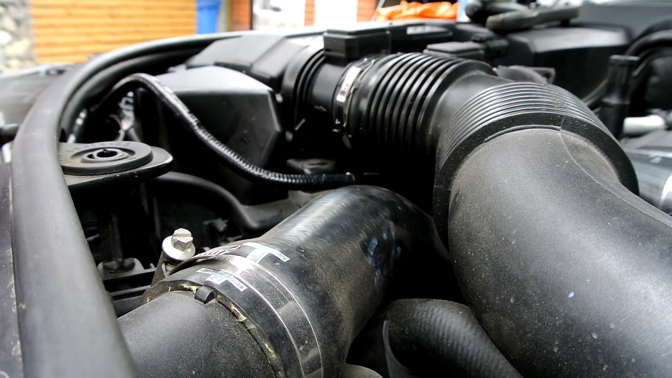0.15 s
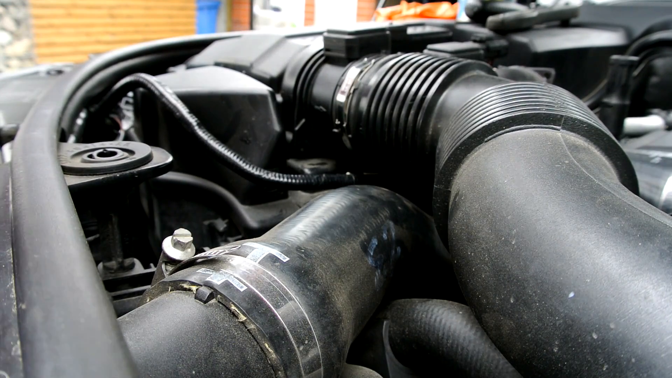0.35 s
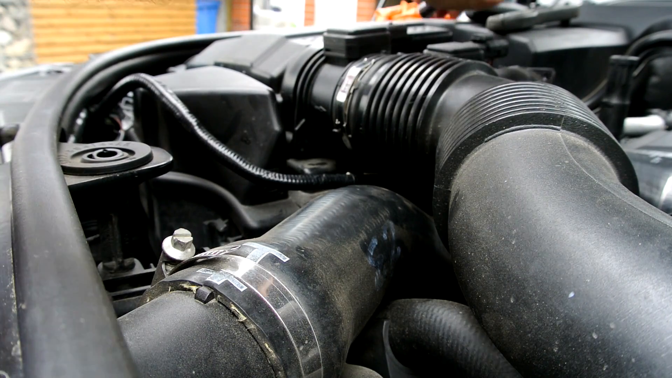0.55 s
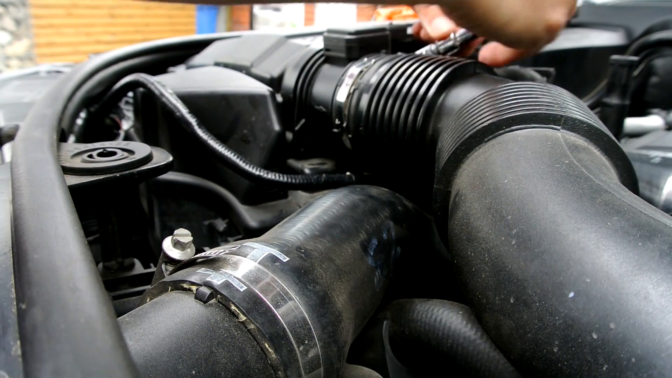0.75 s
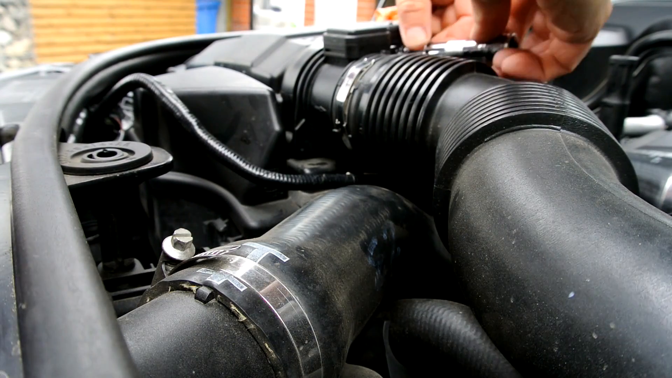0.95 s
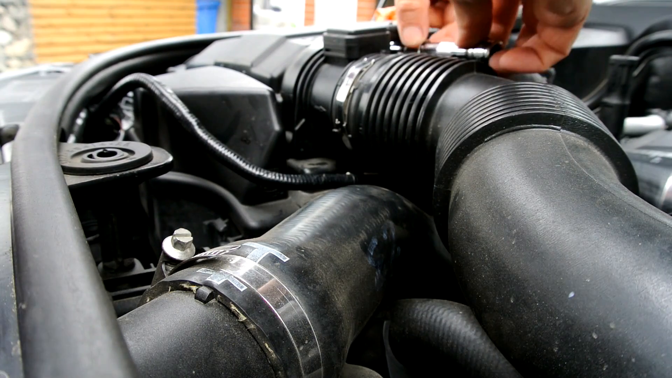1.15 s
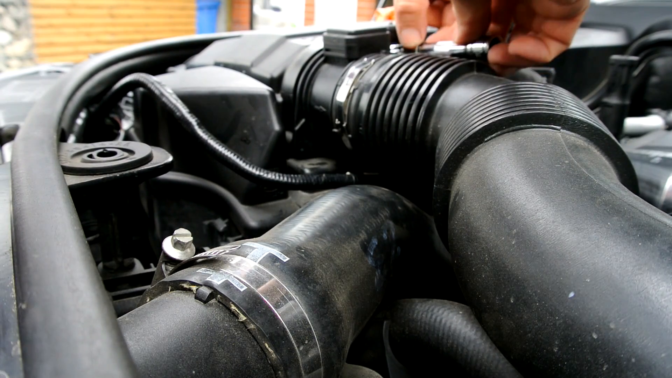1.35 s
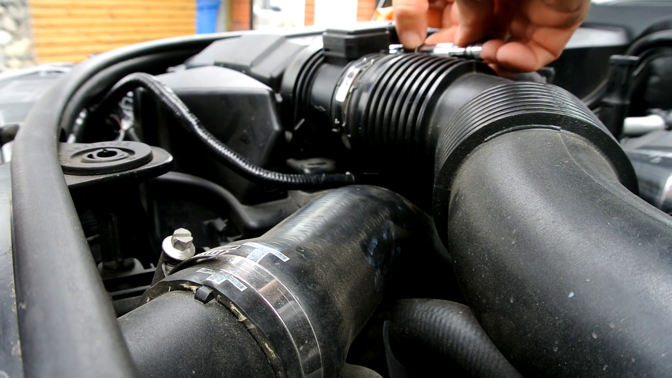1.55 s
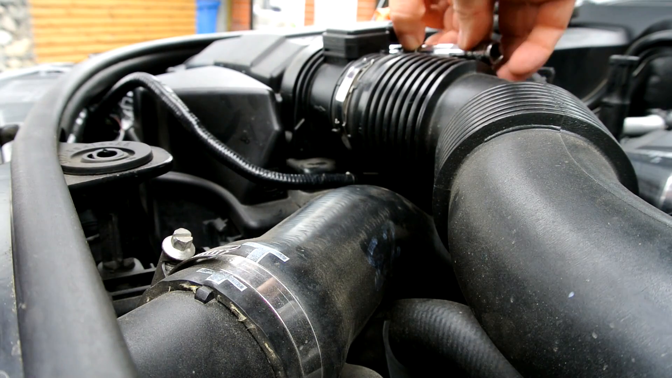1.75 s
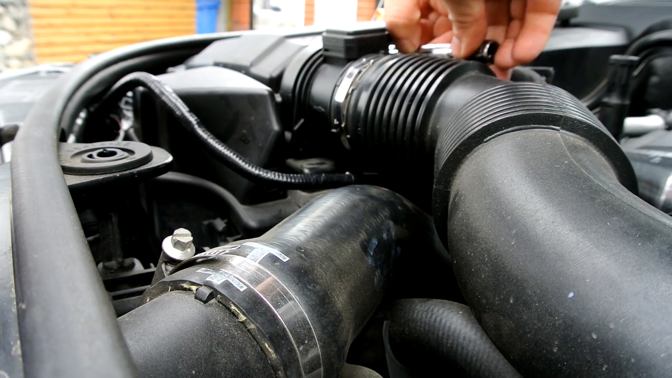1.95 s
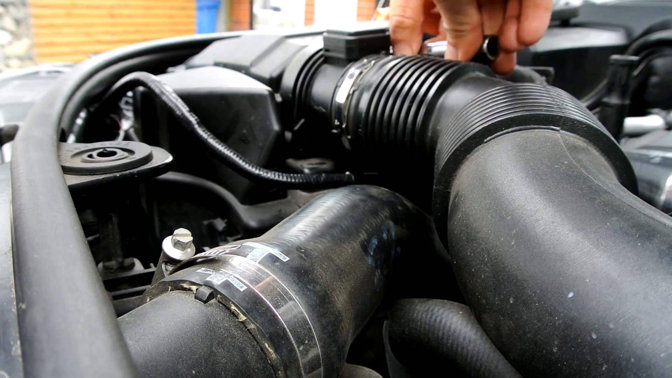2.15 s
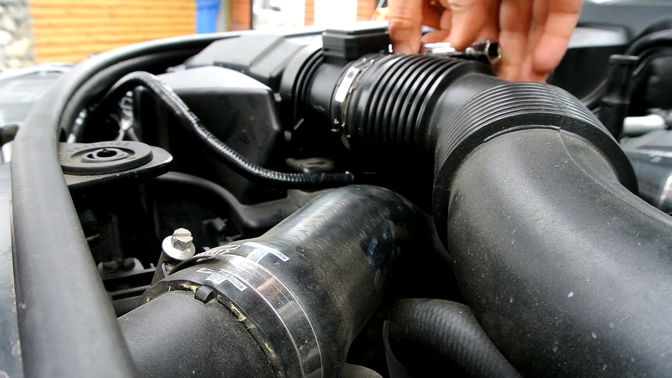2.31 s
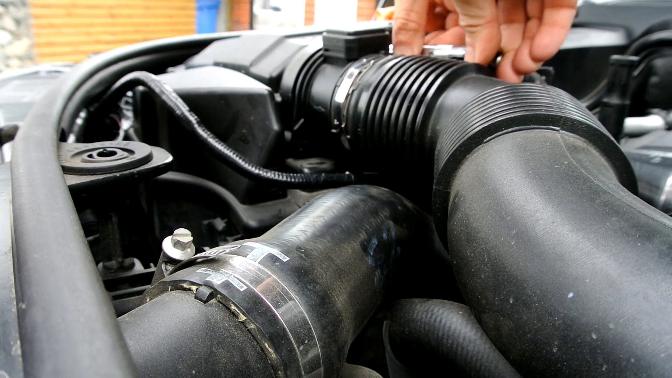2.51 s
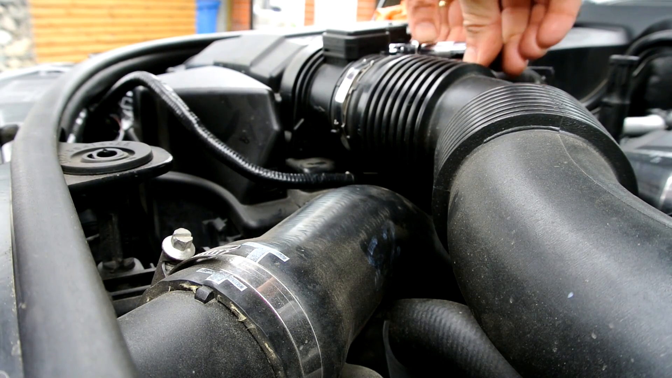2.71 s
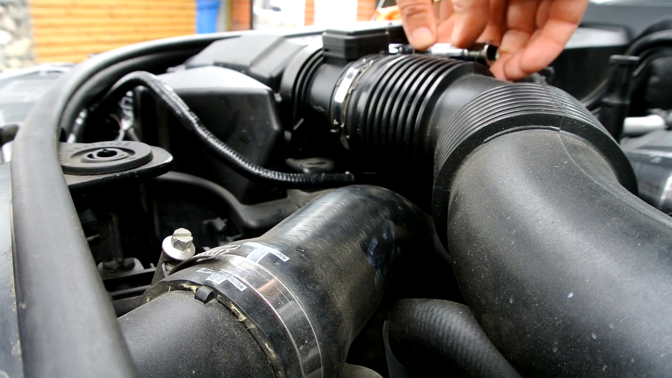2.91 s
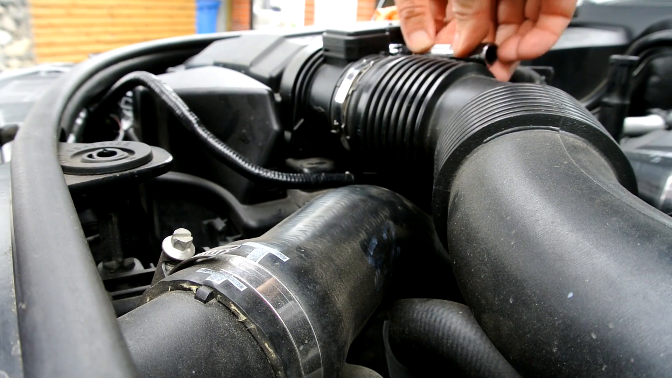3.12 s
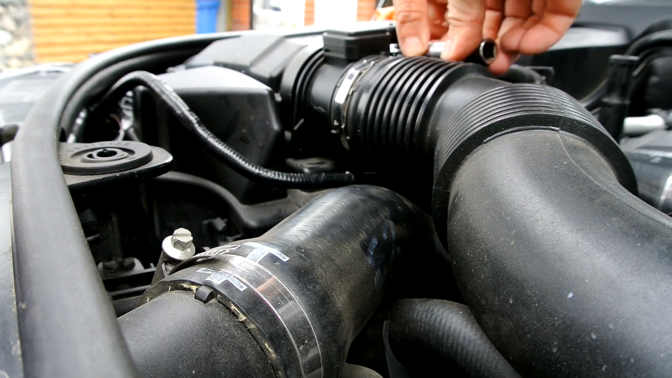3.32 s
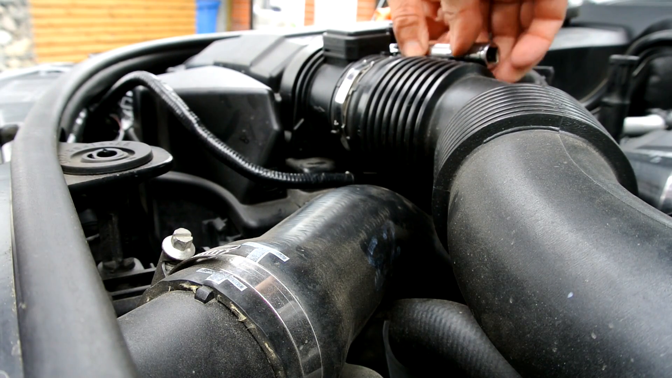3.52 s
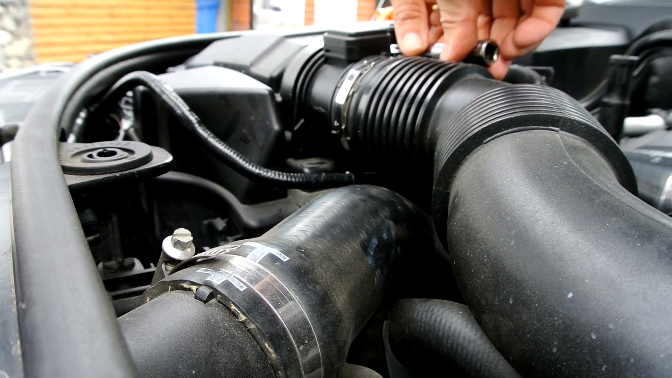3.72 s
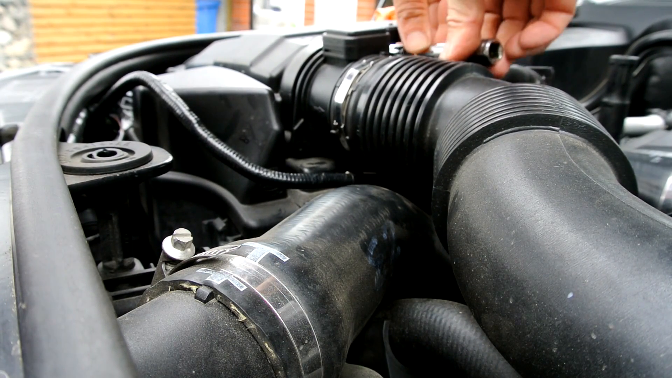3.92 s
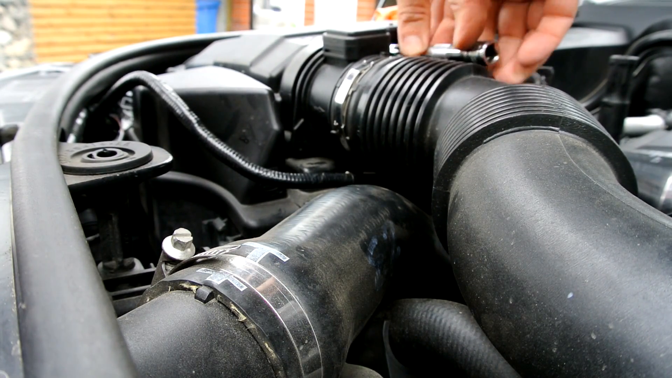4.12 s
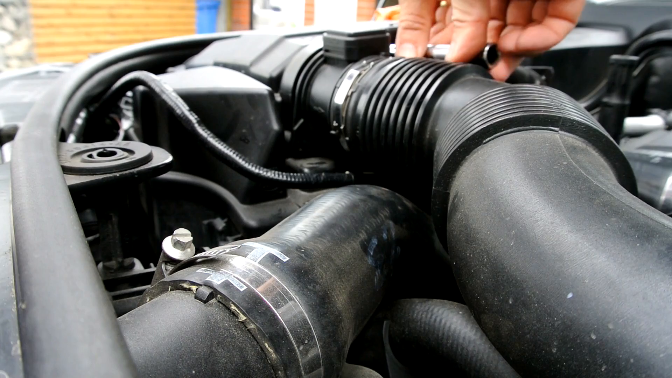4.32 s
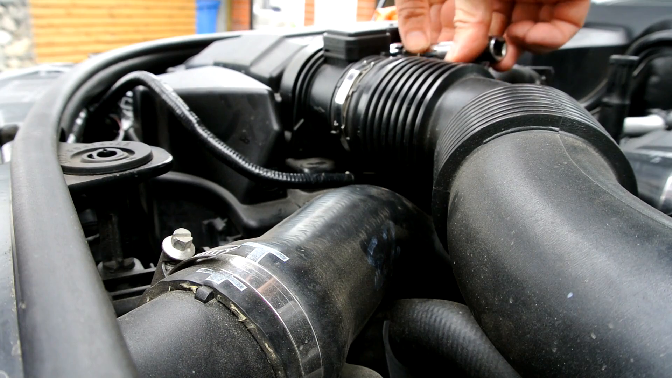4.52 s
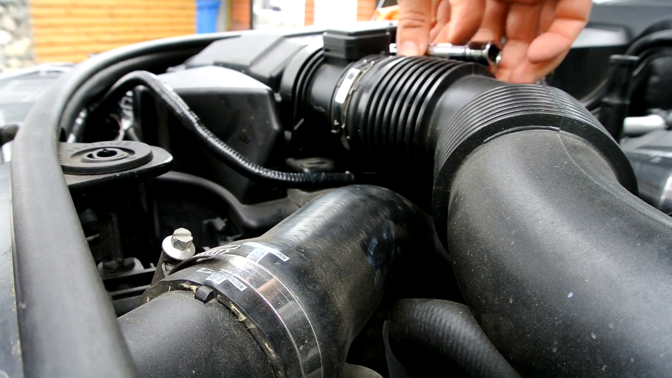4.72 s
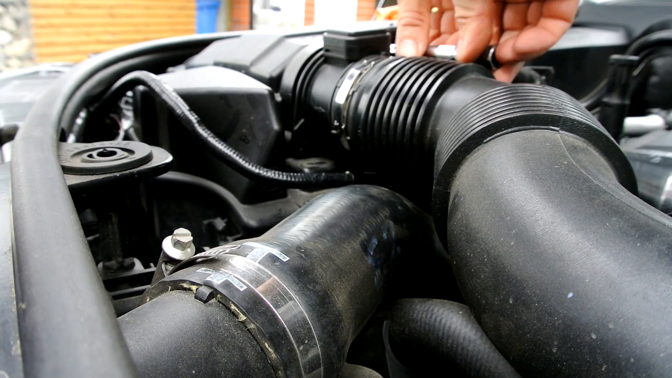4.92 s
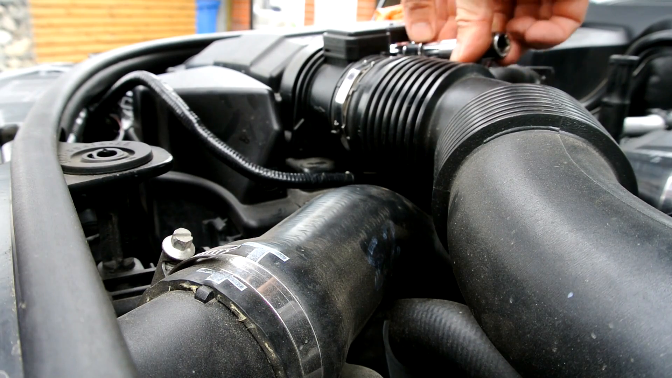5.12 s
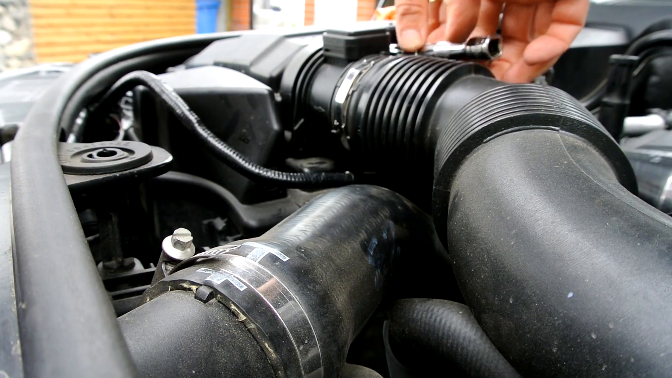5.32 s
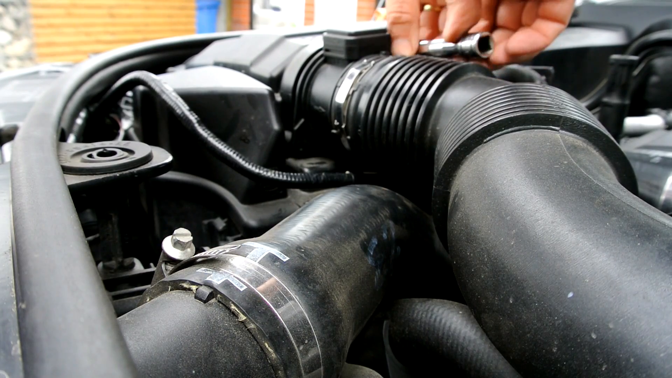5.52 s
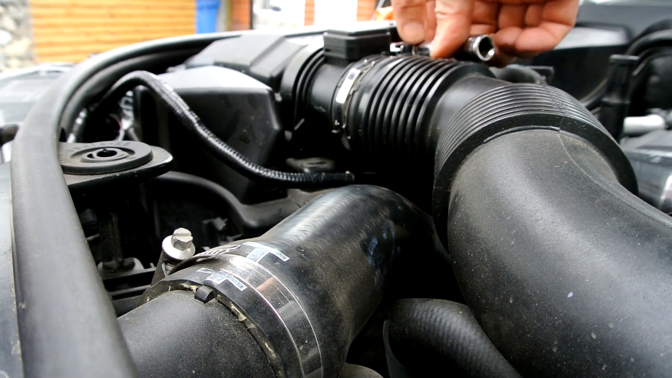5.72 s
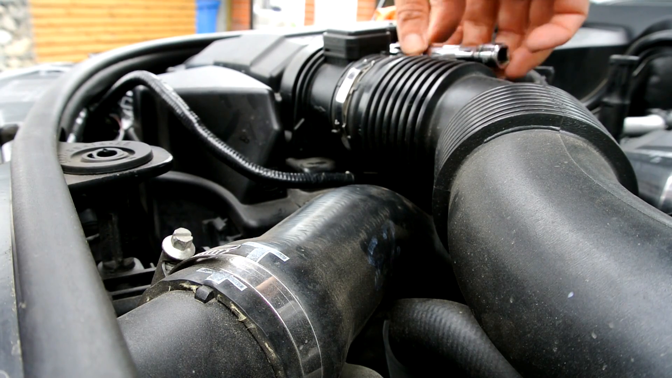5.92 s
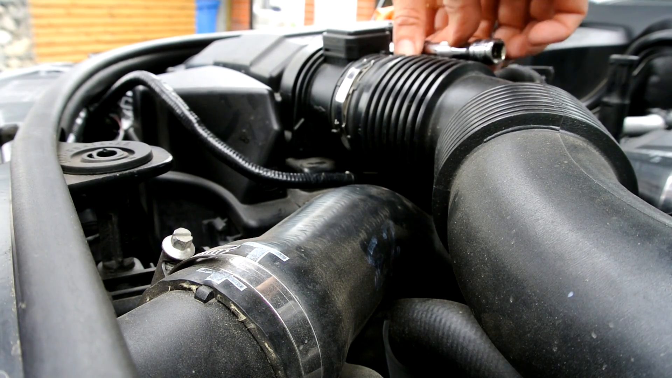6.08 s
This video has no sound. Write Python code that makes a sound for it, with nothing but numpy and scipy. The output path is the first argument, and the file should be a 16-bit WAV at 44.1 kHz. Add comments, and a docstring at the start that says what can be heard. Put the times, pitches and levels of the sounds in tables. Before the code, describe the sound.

A socket is fitted and turned on a clamp: sparse beginning, a gritty scrape and piercing metal crack just after one second, then uneven small clacks, woody plastic taps and grainy skin rubs. Around three seconds a tiny ratchet-like click run slows down, and later touches boom more in the hollow duct. Microphone very near, outdoors, with short dull reflections, low wavering hum, steady soft hiss and a few faint birdlike chirps.

```python
"""Steel knocks, snaps and scrapes, the thud of a hollow plastic duct, and fingers rubbing in between.
A small socket tool is fitted and turned on a clamp of an intake duct, in an open engine bay.
Knocks and snaps are sets of fading tones with a burst of noise; scrapes and rubs are crowds of tiny slips.
Behind them: a low outdoor hum made of two wavering tones, a steady background hiss of filtered noise and
a few faint chirps, likely a far bird, made of gliding tones that are blurred by noise."""
import sys
import numpy as np
from scipy import signal
from scipy.fft import rfft, irfft, next_fast_len
from scipy.io import wavfile
from scipy.ndimage import map_coordinates

SR = 44100
rng = np.random.default_rng(int(sys.argv[2]) if len(sys.argv) > 2 else 0)


def unload_wav(signal):
    """Save mono or channel-first audio to the path in sys.argv[1] as 16-bit WAV at rate SR, clipped to [-1, 1]."""
    wavfile.write(
        sys.argv[1],
        SR,
        np.round(np.clip(np.atleast_2d(signal).T, -1, 1) * 32767).astype(np.int16),
    )


N = 271215
TIME = np.arange(N) / SR

# strokes of the fingers: (start [s], length [s], pressure [dB], skin hiss [dB])
STROKES = [(.07, .08, -66, -49.5), (0.226, 0.068, -66, -49), (1.091, .13, -48.5, -62),
           (1.269, 0.056, -44.5, -67), (1.44, 0.11, -48, -60), (1.60, 0.35, -53.5, -47.5),
           (1.938, 0.1, -47.5, -45.5), (2.056, 0.1, -48.5, -52), (2.239, 0.15, -50.5, -54),
           (2.451, 0.18, -48, -45.5), (2.653, .08, -54, -56), (2.782, .25, -47.5, -52),
           (3.127, .09, -44.5, -47), (3.25, .10, -57, -61), (3.37, 0.087, -49, -48.5),
           (3.567, 0.2, -51.5, -59), (3.787, .09, -62, -52), (3.99, 0.077, -48, -51),
           (4.155, .15, -45.5, -48.5), (4.399, .09, -55.5, -50), (4.629, .14, -48, -53.5),
           (4.91, 0.12, -46.5, -48), (5.06, 0.11, -56, -64.5), (5.232, 0.22, -46.5, -49.5),
           (5.552, .18, -47.5, -49.5), (5.782, 0.069, -50.5, -50), (5.876, 0.23, -47, -49.5),
           (6.09, .06, -55, -55)]
# from this moment on the hand rests on the tool with a light pressure
GRIP_S, GRIP_DB = 0.93, -57.5
# once seated, the socket bears on the whole duct, which then answers deeper
SEATED_S, LOOSE_DEPTH_DB, SEATED_DEPTH_DB = 3.02, -2.5, 2.0


def from_db(db):
    """Turn decibels into a gain."""
    return 10 ** (np.asarray(db) / 20)


def rms_one(x):
    """Scale a sound to an average (rms) level of 1."""
    return x / np.sqrt(np.mean(x ** 2) + 1e-20)


def in_time(rows):
    """Read the columns of a curve at every sample."""
    s, *columns = np.transpose(rows)
    return [np.interp(TIME, s, column) for column in columns]


def at_hz(points, hz):
    """Read a spectrum on a log-frequency axis."""
    f, value = np.transpose(points)
    return np.interp(np.log(hz), np.log(f), value)


def filtered(x, hz, kind, order=2):
    """Keep a range of frequencies with a Butterworth filter that runs forward in time."""
    sos = signal.butter(order, np.clip(hz, 10, .45 * SR), kind, fs=SR, output="sos")
    return signal.sosfilt(sos, x)


def drift(rate, size=N):
    """Wander smoothly at random, with rms 1, through `rate` random points per second."""
    knots = rng.standard_normal(4000)
    return rms_one(map_coordinates(knots, [np.arange(size) / SR * rate], order=3, mode="wrap"))


def add(out, s, sound):
    """Mix a sound in at time s."""
    at = int(s * SR)
    out[:, at:at + sound.shape[-1]] += sound[..., :N - at]


def stereo(mid, side):
    """Make left and right from their common and opposed parts."""
    return np.array([mid + side, mid - side])


def coloured(pair, colour):
    """Give two unrelated signals a spectrum and make left and right partly alike; rms 1."""
    # how alike left and right are: (frequency [Hz], correlation [-1 to 1])
    likeness = [(60, 0.82), (250, 0.82), (500, 0.61), (1500, 0.34), (4000, 0.16), (8000, 0.071),
                (16000, -0.23)]
    size = next_fast_len(N)
    hz = np.maximum(np.arange(size // 2 + 1) * SR / size, 1)
    # beyond its two ends the spectrum falls away
    low, high = colour[0][0], colour[-1][0]
    skirts = np.minimum(hz / low, 1) ** 2 * np.minimum(high / hz, 1) ** 2
    mid, side = rfft(pair, size) * from_db(at_hz(colour, hz)) * skirts
    alike = np.clip(at_hz(likeness, hz), -.99, .99)
    spectra = stereo(np.sqrt(1 + alike) * mid, np.sqrt(1 - alike) * side)
    return rms_one(irfft(spectra, size)[:, :N])


def friction(colour, slips_per_s, grain_db, lump_db, lump_rate):
    """Let surfaces stick and slip: tiny releases of uneven size, coming in clumps; rms 1."""
    sizes = from_db(grain_db * np.minimum(rng.exponential(1, N), 4))
    clumps = from_db(lump_db * drift(lump_rate))
    slips = (rng.random(N) < slips_per_s / SR) * sizes * clumps
    return coloured(slips * rng.choice([-1, 1], (2, N)), colour)


def background():
    """Hum like a distant engine, two low tones wavering in pitch and level, over a steady hiss."""
    # course of the hum's level: (time [s], level [dB])
    hum_course = [(0, -53), (.75, -57.5), (1.2, -53.5), (1.95, -57.5), (2.1, -72), (4.9, -65), (5.3, -58),
                  (6.15, -57)]
    # steady background hiss: (frequency [Hz], relative level [dB per Hz])
    hiss_colour = [(15, -55), (25, -36), (80, -5.5), (117, -18.5), (180, -15.5), (405, -14.5), (754, -14),
                   (1160, -15.5), (1790, -17), (2760, -19), (8000, -19), (12500, -19), (16000, -25.5)]
    hum_hz, drone_hz, drone_db, hiss_db = 78.8, 52, -64.5, -48.5
    hum_db, = in_time(hum_course)
    hum_level = from_db(hum_db + 0.82 * drift(11))
    # the waver is counted in cycles of the tone
    hum = hum_level * rms_one(np.sin(2 * np.pi * (hum_hz * TIME + 0.05 * drift(11))))
    drone_level = from_db(drone_db + drift(17))
    drone = drone_level * rms_one(np.sin(2 * np.pi * (drone_hz * TIME + 0.39 * drift(19))))
    hiss = from_db(hiss_db) * coloured(rng.standard_normal((2, N)), hiss_colour)
    return hum + drone + hiss


def chirps(width_hz=260):
    """Call thinly from afar: gliding tones that random warbling smears."""
    # far chirps: (start [s], length [s], first pitch [Hz], last pitch [Hz], level [dB])
    calls = [(1.62, .12, 8130, 7700, -59), (1.935, 0.08, 4000, 3870, -50), (2.08, 0.051, 3900, 3750, -51.5),
             (2.444, 0.071, 7900, 7500, -51.5), (2.606, 0.043, 3890, 3700, -42.5),
             (2.86, 0.11, 8300, 7600, -50), (3.497, .11, 7300, 8000, -54), (3.685, 0.046, 3900, 3820, -52),
             (4.022, 0.1, 7460, 8000, -57), (4.919, 0.058, 3800, 3880, -47.5),
             (5.022, 0.15, 7600, 7300, -48.5), (5.76, 0.15, 7800, 7500, -57),
             (5.913, 0.067, 3990, 3930, -51.5)]
    out = np.zeros((2, N))
    noise = rng.standard_normal((2, N)) + 1j * rng.standard_normal((2, N))
    blur = filtered(noise, width_hz, "low")
    blur /= np.std(blur)
    for s, length, start_hz, end_hz, db in calls:
        size, at = int(length * SR), int(s * SR)
        glide_hz = np.linspace(start_hz, end_hz, size)
        carrier = np.exp(2j * np.pi * np.cumsum(glide_hz) / SR)
        swell = np.sin(np.linspace(0, np.pi, size))
        mid, side = (blur[:, at:at + size] * carrier).real * swell
        add(out, s, from_db(db) * rms_one(stereo(mid, 0.69 * side)))
    return out


def finger_strokes():
    """Follow pressure and skin hiss over time: each stroke swells, holds and lets go."""
    attack_s, release_s = 0.019, 0.047
    pressure, skin = from_db(GRIP_DB) * (TIME > GRIP_S), np.zeros(N)
    for start, length, pressure_db, skin_db in STROKES:
        swell = np.clip((TIME - start) / attack_s, 0, 1)
        release = np.clip((start + length - TIME) / release_s + .5, 0, 1)
        pressure = np.maximum(pressure, from_db(pressure_db) * swell * release)
        skin = np.maximum(skin, from_db(skin_db) * swell * release)
    return pressure, skin


def handling(flex_db=-4.0, rumble_db=-1.5, rub_db=0.1):
    """Shift fingers on the duct: its wall flexes, its hollow rumbles, skin rubs with a grainy hiss."""
    # four spectra, each (frequency [Hz], relative level [dB per Hz]):
    # the duct wall flexing under the fingers, the rumbling hollow, the rub, the hiss of skin
    flex_colour = [(35, -14), (55, -2.5), (100, -5.5), (150, -0.5), (210, -5), (300, -8.5)]
    rumble_colour = [(150, -19), (230, -7), (300, 1), (450, -8.5), (650, -9), (900, -45)]
    rub_colour = [(500, -26), (800, 1.5), (1200, -2), (1900, -2.5), (3400, -3), (5500, -10.5), (8000, -16)]
    skin_colour = [(3500, -4), (6000, -3), (8000, 1.5), (12000, 0), (16000, -12.5)]
    pressure, skin = finger_strokes()
    depth = from_db(np.where(TIME < SEATED_S, LOOSE_DEPTH_DB, SEATED_DEPTH_DB))
    flex = friction(flex_colour, slips_per_s=1500, grain_db=2.5, lump_db=5.5, lump_rate=15)
    rumble = friction(rumble_colour, slips_per_s=350, grain_db=2.5, lump_db=2.5, lump_rate=36)
    rub = friction(rub_colour, slips_per_s=2200, grain_db=2.5, lump_db=2.0, lump_rate=51)
    hiss = friction(skin_colour, slips_per_s=22000, grain_db=4.5, lump_db=2.5, lump_rate=40)
    pressed = depth * from_db(flex_db) * flex + from_db(rumble_db) * rumble + from_db(rub_db) * rub
    return pressure * pressed + skin * hiss


def scrapes():
    """Skid steel over ribs and clamp: a gritty plastic rasp and a finer steel hiss follow the pressure."""
    # skids, with their levels at the middle: (start [s], end [s], rasp [dB], steel hiss [dB])
    skids = [(1.123, 1.161, -24.5, -33), (1.15, 1.187, -32, -38), (1.476, 1.509, -37.5, -48),
             (2.259, 2.288, -43, -40), (2.288, 2.304, -35.5, -44), (2.925, 3.017, -42.5, -52),
             (3.376, 3.417, -40, -45), (3.987, 4.013, -35, -37.5), (4.170, 4.246, -47, -54),
             (4.62, 4.664, -34.5, -37), (5.216, 5.26, -38, -34.5), (5.853, 5.88, -46, -43),
             (5.898, 5.952, -42, -50)]
    # clamp and duct under a skid: (frequency [Hz], relative level [dB per Hz])
    rasp_colour = [(200, -25), (450, -2), (760, -7), (1130, -3), (1530, -11), (1800, 4), (2080, -4.5),
                   (3300, -4), (4350, -3.5), (5200, -7.5), (8000, -17), (10000, -16), (11300, -13),
                   (16000, -32)]
    # steel sliding on steel: (frequency [Hz], relative level [dB per Hz])
    steel_colour = [(3300, -20), (4350, -10), (5000, -9), (6600, 3), (7700, -1), (9500, -10), (11300, -8.5),
                    (14000, -26)]
    rasp, hiss = np.zeros((2, 1, N))
    for start, end, rasp_db, hiss_db in skids:
        pressure = np.sin(np.linspace(0, np.pi, max(2, int((end - start) * SR))))
        add(rasp, start, from_db(rasp_db) * pressure)
        add(hiss, start, from_db(hiss_db) * pressure)
    grit = friction(rasp_colour, slips_per_s=5000, grain_db=2.5, lump_db=2.0, lump_rate=350)
    steel = friction(steel_colour, slips_per_s=11000, grain_db=1.5, lump_db=4.0, lump_rate=560)
    return rasp * grit + hiss * steel


def snaps(crack_db=-8):
    """Snap steel on steel: a crack and a bright, very short ring, whose high modes fade first."""
    # the socket snaps against the screw head: (time [s], level [dB], pitch ratio)
    hits = [(1.138, -22, 1.2), (1.1423, -14.5, 1.17), (1.1486, -14.5, 1.15), (1.1567, -24, 0.69),
            (1.3094, 1.5, 1.005), (1.3112, -11, 1.0), (1.3174, -15, 1.0), (1.8813, -13.5, 1.05),
            (1.8853, -30, 1), (1.888, -24.5, 1.06)]
    # steel socket, before the pitch ratio of each snap: (frequency [Hz], level [dB])
    socket_modes = [(1520, -21.5), (2400, -19), (3400, -4.5), (3600, -1), (4220, -6.5), (4900, -11),
                    (5360, -10.5), (6030, -14), (7200, -10.5), (11600, -32), (13000, -27)]
    ring_s = .013  # time to fade by 60 dB
    phase_spread, level_spread_db = .25, 2.0  # between left and right; phase in radians each way
    out, t = np.zeros((2, N)), TIME[:SR // 20]
    for s, db, ratio in hits:
        crack = filtered(rng.standard_normal((2, len(t))), [1200, 9000], "band", order=1)
        add(out, s, from_db(db + crack_db - 60 * t / ring_s) * stereo(crack[0], .5 * crack[1]))
        for k, (hz, mode_db) in enumerate(socket_modes):
            # each mode reaches the two microphones a little differently
            pan, turn = rng.standard_normal(2)
            t60 = ring_s * min(1, np.sqrt(3600 / hz))
            phase = 2 * np.pi * hz * ratio * t + stereo(0, phase_spread * turn)[:, None]
            balance_db = stereo(0, level_spread_db * pan / 2)[:, None]
            level_db = db + mode_db - 60 * t / t60 + balance_db
            add(out, s, (-1) ** k * from_db(level_db) * np.sin(phase))
    return out


def click_run(count=5):
    """Click alike in strength as the socket is turned, slowing down, each gap longer than the last."""
    # every click: (strength [dB], hardness [dB], woodiness [dB], duct's answer [dB against the strength])
    run_touch = (-46, 1.5, -2.5, -18)
    start_s, first_gap_s, slowing = 2.955, 0.012, 1.11
    gaps = first_gap_s * slowing ** np.arange(count - 1)
    return [(s, *run_touch) for s in start_s + np.append(0, np.cumsum(gaps))]


def stray_touches(count=24):
    """Touch faintly at random moments within the firmer strokes of the fingers."""
    # middle values: (strength [dB], hardness [dB], woodiness [dB], duct's answer [dB against the strength])
    stray_touch = (-59, 0, 4.5, 0)
    spread_db = 2.5
    firm = np.array([stroke[:2] for stroke in STROKES if stroke[2] > GRIP_DB])
    which, when = rng.random((count, 2)).T
    start, length = firm[(which * len(firm)).astype(int)].T
    s = np.minimum(start + when * length, TIME[-1])
    levels = stray_touch + spread_db * rng.standard_normal((count, len(stray_touch)))
    return np.column_stack([s, levels])


def touch_levels():
    """Share out each touch: plastic knocks woodily, the clamp clacks, a hard touch ticks, the duct booms."""
    # the tool touches clamp and duct: (time [s], strength [dB], hardness [dB], woodiness [dB],
    # duct's answer [dB against the strength])
    tool_touches = [(.4465, -66, 17, -6, -8), (.9503, -61, 2, 8, -2), (1.0032, -41.5, -1.5, -2, -21),
                    (1.0895, -37.5, -11, -8, -14), (1.0911, -30.5, -2, 10, -3.5), (1.143, -35, -9, 6, -3.5),
                    (1.1488, -35, -12, 5, -17), (1.1574, -38, -4, 11, -3), (1.1668, -37.5, -3, 7, -0.5),
                    (1.2821, -52.5, 5, 7, 8.5), (1.311, -42.5, -3, 3, 2), (1.486, -46, -4, 10, 1),
                    (1.4924, -40.5, -9, 3.5, 1), (1.524, -54.5, 7, -3, -8), (1.711, -48, -1, -0.5, -20),
                    (1.8558, -55.5, -2, 7, 6.5), (1.886, -43.5, -6, -1, -7.5),
                    (1.9495, -58.5, 17.5, -1, -13), (1.9806, -50.5, 2, 0, -7), (2.0799, -53.5, 0, 3, -15),
                    (2.127, -55, 0, 3, 4), (2.15, -69, 0, 0, 15), (2.2148, -49.5, -9, -2, -6),
                    (2.2276, -47, -10, -3, -10), (2.2397, -39.5, -13, -8.5, -17), (2.242, -46, -5, -3, -1),
                    (2.2618, -45, 3, 3, 1), (2.294, -41, 7, 0, -4), (2.303, -42, 3, 0, -4.5),
                    (2.3868, -51, -11, 4, -2), (2.471, -61, 10, -5, 13), (2.5359, -52.5, -5, 11, 4),
                    (2.674, -55, 7, -6, -1), (2.8283, -41, -6, 3.5, -2), (2.886, -39.5, -3, -4, -9),
                    (2.8885, -29.5, -7, -5, -20), (2.8943, -36.5, -1, 4, -3), (2.94, -47, 5, 6, -1.5),
                    (3.0528, -40.5, 6, 0, -6), (3.095, -44.5, 6.5, -1.5, -22), (3.1591, -46.5, -2, -1, 1),
                    (3.168, -49.5, 10.5, -3, 2.5), (3.2315, -64.5, 23, -5, -4), (3.399, -44.5, -2, 2, -5),
                    (3.4227, -46.5, -2, 3, -1.5), (3.6287, -55, -8, 8, 5.5), (3.6573, -54, -7, 9, -4),
                    (3.7206, -53, -1, 10, 5), (3.7529, -55, -8, 16, 1), (4.0001, -45, 9, -3, 1),
                    (4.0253, -58, 8, -3, 10.5), (4.1893, -49, 5, -2, 4), (4.215, -57.5, 10, -6, 13.5),
                    (4.2514, -54, -2, 5, 0), (4.2791, -42.5, -5, -4, -4.5), (4.2995, -51.5, -6, 5, 2),
                    (4.3878, -47, -5, -13, -17), (4.3922, -38.5, -2, 7, -9.5), (4.4011, -44, -6, 13, -1.5),
                    (4.636, -38, 3, 10, -7), (4.647, -36, 7.5, -7.5, -2.5), (4.8628, -53, -11, 6.5, -23),
                    (4.9915, -43, 10.5, 1, -6), (5.0077, -54, -5, 8, 4), (5.0715, -46, 8, 2, -8.5),
                    (5.1158, -47.5, 1, -6, -10), (5.2202, -39, -8, 0, -5), (5.2268, -49, 10, 4, 0),
                    (5.2462, -32.5, 3.5, -7, -4), (5.252, -39.5, -6, 0, 4.5), (5.335, -62.5, 0, -3, 14),
                    (5.5688, -60, 0, -10, 14.5), (5.822, -53, 4, -10, -6), (5.9126, -42.5, 10.5, -8, -1.5)]
    # the two top registers of a touch of middling hardness, against its strength
    tick_db, glint_db = -9.5, -14.5
    touches = np.vstack([tool_touches, click_run(), stray_touches()])
    s, strength, hardness, woodiness, duct = touches.T
    depth = np.where(s < SEATED_S, LOOSE_DEPTH_DB, SEATED_DEPTH_DB)
    boom, thud = strength + duct + depth, strength + duct - depth
    knock, clack = strength + woodiness / 2, strength - woodiness / 2
    tick, glint = strength + hardness + tick_db, strength + hardness + glint_db
    return np.column_stack([s, boom, thud, knock, clack, tick, glint])


def contacts(rise_s=0.00026, swell_s=0.0044):
    """Ring the modes anew at each touch; the hollow duct swells more slowly than the steel."""
    # frequency bands from boom to glint: (low edge [Hz], high edge [Hz])
    registers = [(90, 330), (330, 750), (750, 1700), (1700, 4300), (4300, 8600), (8600, 16000)]
    # duct, clamp and tool together: (frequency [Hz], level [dB], longest time to fade by 60 dB [s])
    duct_modes = [(131, -7, 0.075), (182.4, -7.5, 0.082), (239.3, -9.5, 0.14), (293.2, 2, 0.097),
                  (354, -3, 0.048), (453.5, -3.5, 0.082), (559, 2, 0.036), (935, -5, 0.02),
                  (1116, 4, 0.025), (1242, 4.5, 0.024), (1550, -5.5, 0.049), (2065, 4, 0.018),
                  (2410, 0.5, 0.014), (2763, -0.5, 0.031), (3063, 1, 0.017), (3505, 4, 0.011),
                  (3920, -33, 0.011), (4318, -2.5, 0.0099), (5460, 1, 0.011), (6210, 2, 0.0148),
                  (6680, 2.5, 0.027), (7600, 0.5, 0.023), (8240, 8, 0.0074), (9000, -4.5, 0.0031),
                  (11400, -14, .007)]
    # unpitched crack of a touch in each register: (level [dB against the modes], time to fade by 60 dB [s],
    # opposed part of left and right [dB], left against right [dB])
    cracks = [(-7.5, 0.057, -20, -1), (-6.5, 0.06, -20.5, 0), (-9, 0.012, -17.5, -1.1),
              (1.5, 0.02, -10, -2), (-0.5, 0.017, -2, -1.5), (7.5, 0.014, 1.5, -1)]
    crack_top_hz = 7300
    blow_s = .04  # a blow's level is its energy averaged over this time
    out, t = np.zeros((2, N)), TIME[:SR // 8]
    hz, mode_db, t60 = np.transpose(duct_modes)
    # no mode takes more than ninety cycles to fade by 60 dB
    t60 = np.minimum(t60, 90 / hz)
    fades = from_db(mode_db[:, None] - 60 * t / t60[:, None])
    rings = fades * np.sin(2 * np.pi * hz[:, None] * t)
    rows = touch_levels()
    for k, ((low, high), crack_row) in enumerate(zip(registers, cracks)):
        crack_db, crack_t60, side_db, pan_db = crack_row
        own = rings[(hz >= low) & (hz < high)]
        attack = 1 - np.exp(-t / (swell_s if k < 2 else rise_s))
        # each mode starts with a random strength and sign, so no two touches sound quite alike
        shape = (len(rows), 2, len(own))
        strengths = from_db(rng.normal(0, 2.5, shape)) * rng.choice([-1, 1], shape)
        ringing = rms_one(strengths @ own * attack)
        noise = rng.standard_normal((len(rows), 2, len(t)))
        crack = filtered(noise, crack_top_hz, "low", order=1) * from_db(-60 * t / crack_t60)
        crack = rms_one(filtered(crack * attack, [low, high], "band", order=3))
        blows = ringing + from_db(crack_db) * crack
        blows /= np.sqrt(np.sum(blows ** 2, axis=-1, keepdims=True) / (blow_s * SR))
        balance_db = stereo(0, pan_db / 2)[:, None]
        for row, (mid, side) in zip(rows, blows):
            add(out, row[0], from_db(row[k + 1] + balance_db) * stereo(mid, from_db(side_db) * side))
    return out


def engine_bay(x, first_s=0.0032):
    """Bounce sound once, dully, off the raised bonnet, then scatter a short tail among the crowded parts."""
    bonnet_echo_s, bonnet_db = .0048, -16.5
    bay_t60_s, bay_top_hz, bay_db = 0.086, 1540, -15
    t = TIME[:SR // 4]
    noise = filtered(rng.standard_normal((2, len(t))), bay_top_hz, "low")
    tail = noise * from_db(-60 * t / bay_t60_s) * (t > first_s)
    tail = rms_one(stereo(tail[0], 0.17 * tail[1]))
    # even out the tail's gain for its length and its narrow band
    tail /= np.sqrt(len(t) * SR / (2 * bay_top_hz))
    dull = filtered(x, 2 * bay_top_hz, "low")
    bounce = np.array([np.interp(TIME - bonnet_echo_s, TIME, channel) for channel in dull])
    scattered = signal.fftconvolve(x, tail, axes=1)[:, :N]
    return x + from_db(bonnet_db) * bounce + from_db(bay_db) * scattered


def scene():
    """Put together the surroundings, the hand, and the tool in the bay."""
    tool = engine_bay(contacts() + snaps() + scrapes())
    return tool + handling() + chirps() + background()


def record(dry):
    """Overload the input on the hardest peaks, which are cut flat, then remove the highest treble."""
    cutoff_hz = 16200
    clipped = np.clip(dry, -.85, .85)
    return signal.sosfilt(signal.ellip(10, .1, 80, cutoff_hz, fs=SR, output="sos"), clipped)


dry = scene()
out = record(dry)
unload_wav(out)
```